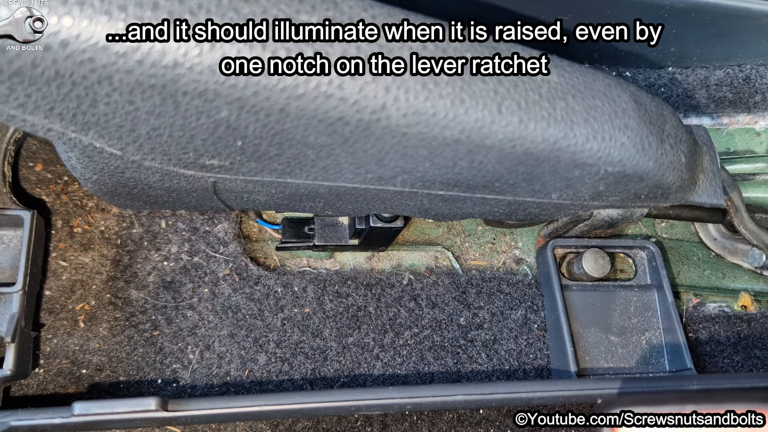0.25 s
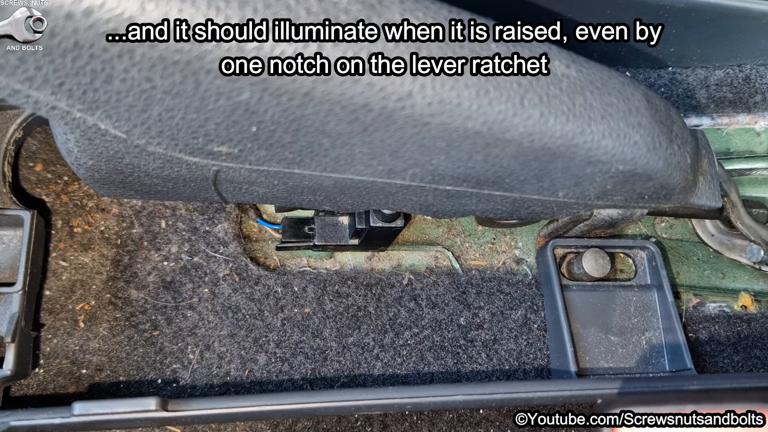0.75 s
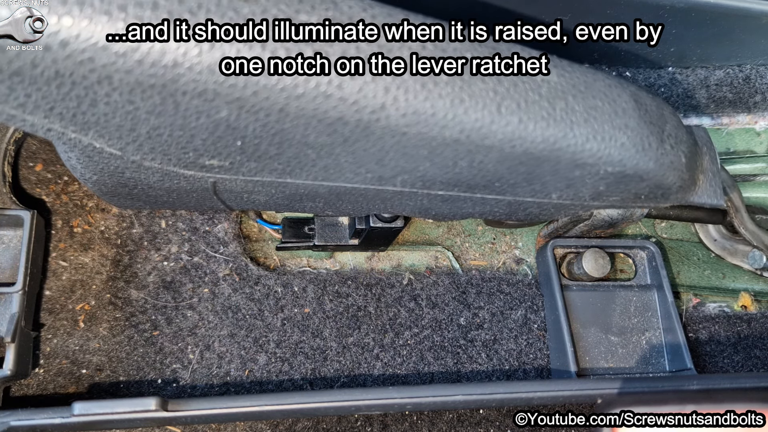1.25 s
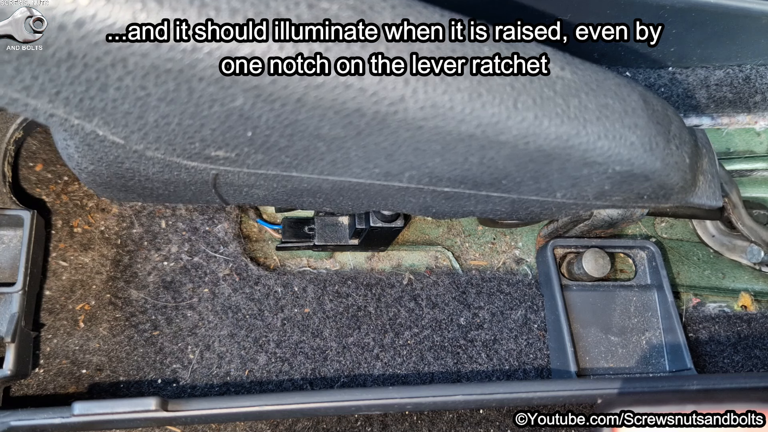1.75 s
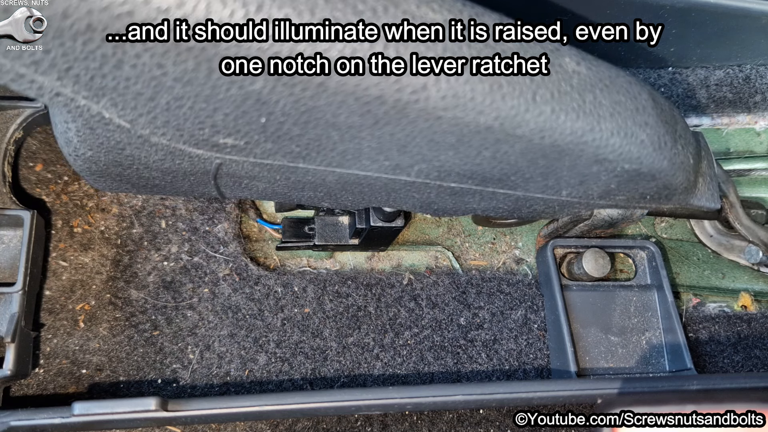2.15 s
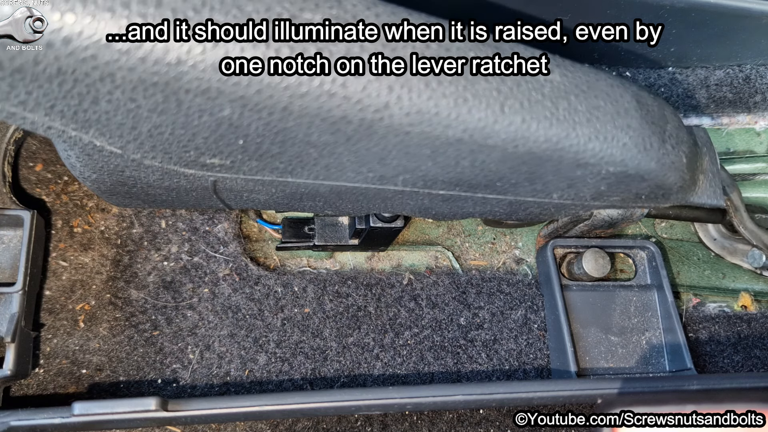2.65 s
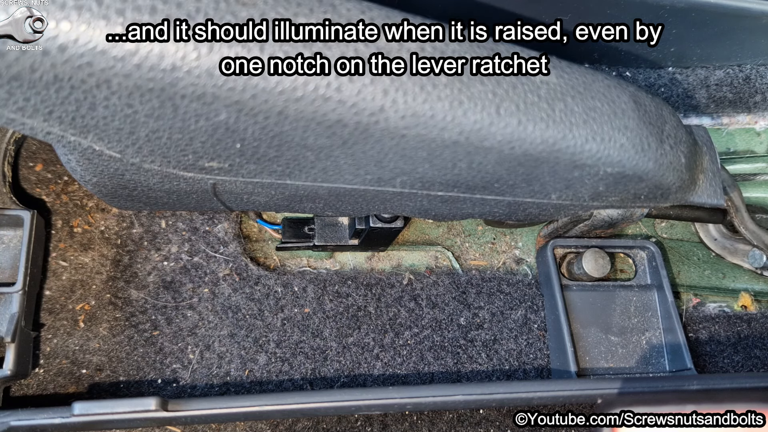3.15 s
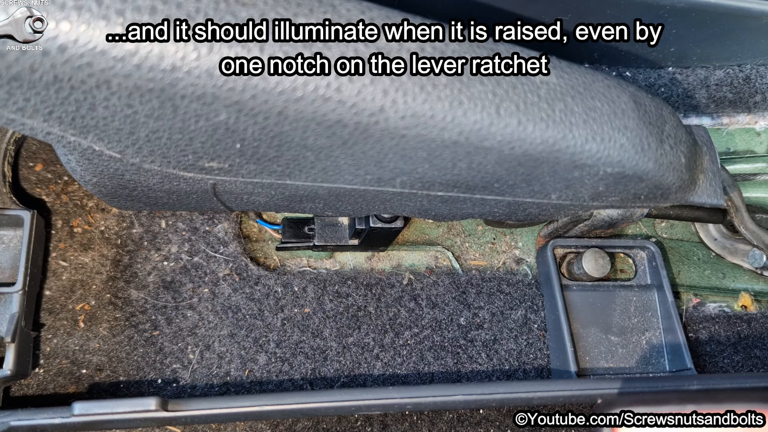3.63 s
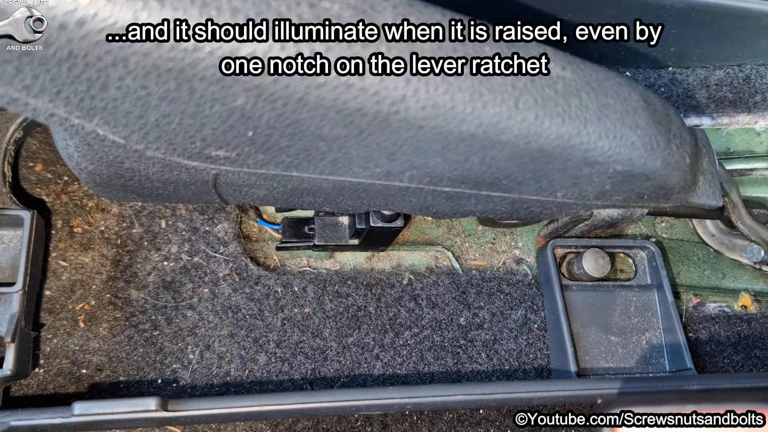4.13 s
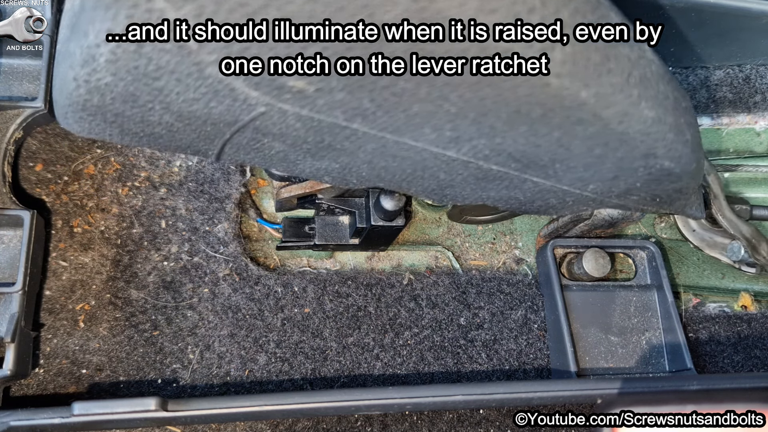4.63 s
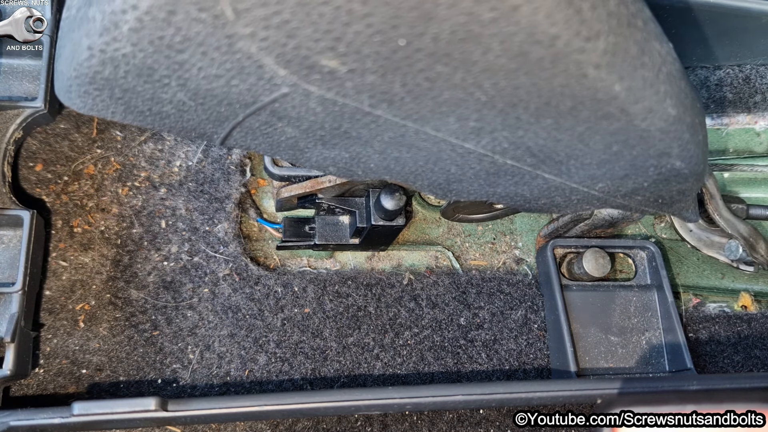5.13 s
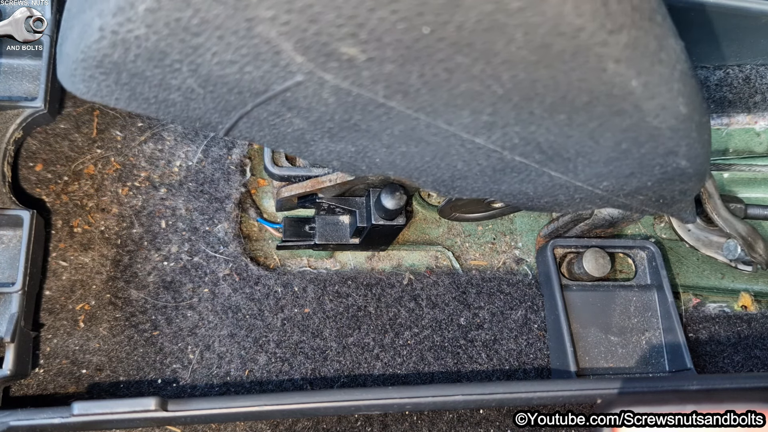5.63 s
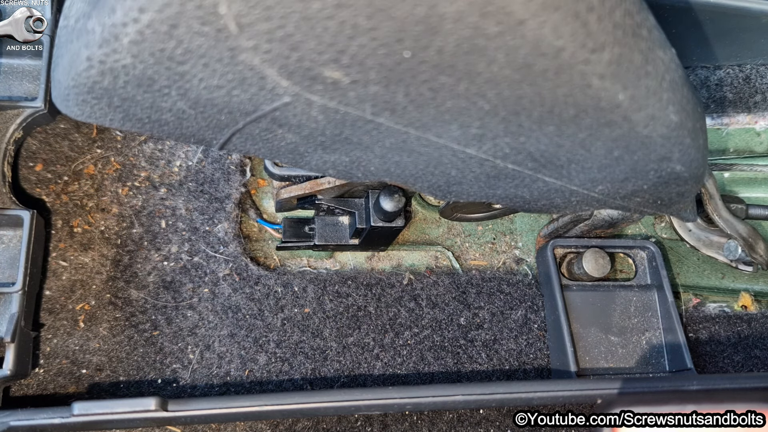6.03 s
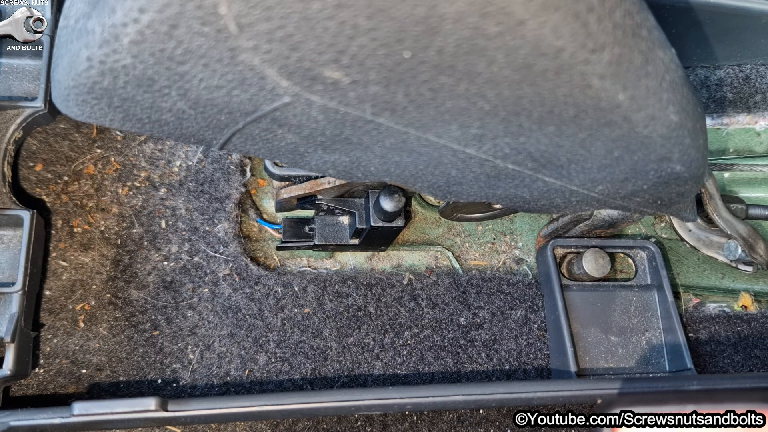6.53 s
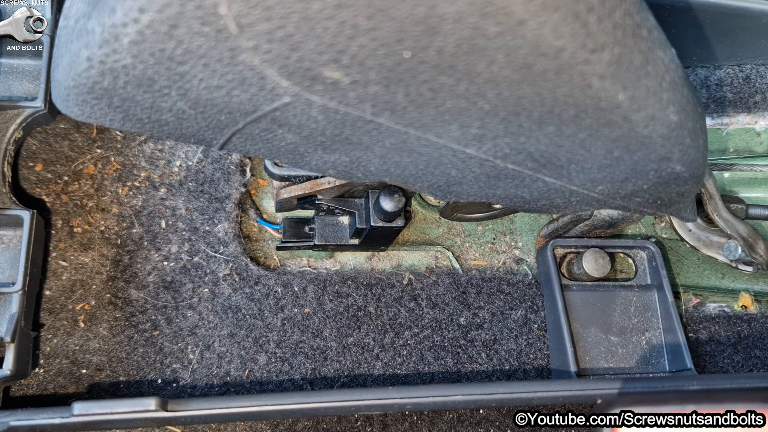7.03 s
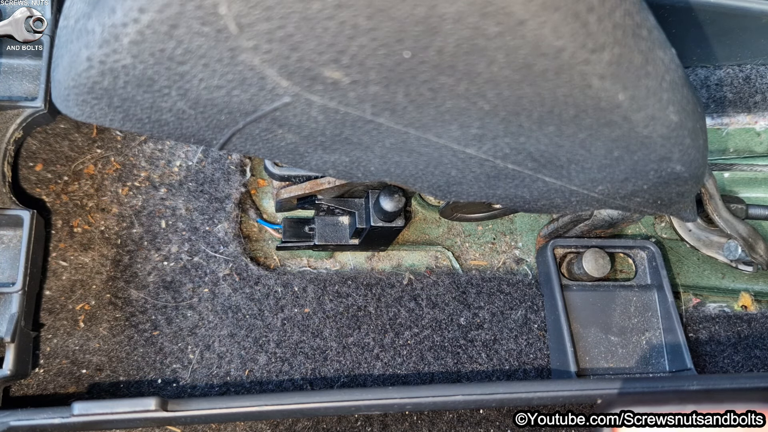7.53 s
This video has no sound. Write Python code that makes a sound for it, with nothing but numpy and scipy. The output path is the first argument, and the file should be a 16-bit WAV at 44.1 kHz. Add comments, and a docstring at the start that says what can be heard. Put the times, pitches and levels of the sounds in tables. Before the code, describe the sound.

Close, dry metal clicks and low floor knocks from a parked car's brake lever, sparse at first, loudest around five seconds, then faint hand rustles.

```python
"""In a parked car, a handbrake lever is worked up and down close to a two-port microphone.
The pawl snaps over ratchet teeth: chattering noise excites the modes of the steel. Jolts ring the floor pan
and the shell as decaying sines; the dragging lever sends random slips through the same pan modes.
The lever's slide and the hand on its cover are gated hiss. Diffuse reflections answer the clicks and thuds;
outside rumble, air hiss, a thin noise-band whine and one faint sine hum lie beneath."""
import sys
import numpy as np
from scipy import signal
from scipy.fft import rfft, irfft
from scipy.io import wavfile
from scipy.ndimage import uniform_filter1d

SR = 44100
rng = np.random.default_rng(int(sys.argv[2]) if len(sys.argv) > 2 else 0)


def persist_wave(psi):
    """Save psi, clipped to +-1, as 16-bit WAV."""
    counts = np.round(np.clip(psi, -1, 1) * 32767).astype(np.int16)
    wavfile.write(sys.argv[1], SR, np.atleast_2d(counts).T)


def volts_from_decibels(level):
    """Turn decibel levels (scalar or array-like) into linear amplitude factors."""
    exponent = np.asarray(level, float) / 20
    return 10 ** exponent


N = 342657

# Modes of the floor pan and lever mount. Each row: frequency in Hz, level in dB before focusing,
# decay time to -60 dB in seconds before the length factor.
PAN_MODES = [(100, -0.5, 0.26), (137.16, -3.5, .16), (185.5, -15.5, 0.17), (227.9, 2.5, 0.081),
             (298.7, 3.5, 0.044), (338.2, 0.5, 0.048), (485, 0.5, 0.029), (513.8, -8.5, .05),
             (600, -12.5, 0.017), (750, -4, 0.029), (800, -9.5, 0.019), (910, -17, 0.083)]
SLIDE_RISE_DB_S, SLIDE_FALL_DB_S = 904.5, 599


def evened(x):
    """Normalisation: scales to rms 1."""
    return x / np.sqrt(np.mean(x ** 2) + 1e-20)


def read(points, hz):
    """Interpolation of a spectrum table on a log-frequency axis."""
    f, value = np.transpose(points)
    return np.interp(np.log(hz + 1), np.log(f + 1), value)


def add(mix, s, sound):
    """Superposition: lays a sound into the mix at s seconds."""
    part = mix[..., round(s * SR):][..., :sound.shape[-1]]
    part += sound[..., :part.shape[-1]]


def ring(modes, t, gains_db, chance, cycles, length=1):
    """Modal synthesis: decaying sines, varied by chance, that swell over some cycles; peak 1."""
    hz, db, t60 = np.transpose(modes)[:, :, None]
    spread_db = 2 * chance[:len(modes)]
    decay_db = 60 * t / (t60 * length)
    swell = (1 - np.exp(-t * hz / cycles)) ** 2
    strength = volts_from_decibels(db + (gains_db + spread_db)[:, None] - decay_db) * swell
    detuned_hz = hz * (1 + 0.017 * chance[-len(modes):, None])
    x = (strength * np.sin(2 * np.pi * detuned_hz * t)).sum(0)
    return x / abs(x).max()


def strokes(rows, rise_db_s, fall_db_s):
    """Exponential envelopes: each stroke swells up to its start, holds, and dies away."""
    t = np.arange(N) / SR
    gain = 0
    for s, hold, db in rows:
        rise_db = rise_db_s * np.maximum(s - t, 0)
        fall_db = fall_db_s * np.maximum(t - s - hold, 0)
        gain = gain + volts_from_decibels(db - rise_db - fall_db)
    return gain


def noise(colour, size, same, patchy_db):
    """Filtered stereo noise, rms 1: random spectra with a set colour, coherence and drifting patches."""
    frames, hz = N * 4 // size + 5, np.fft.rfftfreq(size, 1 / SR)
    a, b, c, d, patches = rng.standard_normal((frames, len(hz), 5)).T
    patches = uniform_filter1d(patches, size=6, axis=0)
    patches = evened(uniform_filter1d(patches, size=10, axis=1))
    like = np.clip(read(same, hz), -1, 1)[:, None]
    left = a + 1j * b
    right = like * left + np.sqrt(1 - like ** 2) * (c + 1j * d)
    z = np.array([left, right]) * volts_from_decibels(read(colour, hz)[:, None] + patchy_db * patches)
    return evened(signal.istft(z, nperseg=size, noverlap=size * 3 // 4)[1][:, :N])


def favoured(colour, hz, favour_hz):
    """Resonance: the click's colour in dB, lifted around the pitch that the blow favours."""
    lift_db, half_width_octaves = 8, 0.12
    octaves = np.log2((hz + 1) / favour_hz)
    return read(colour, hz) + lift_db * np.exp(-(octaves / half_width_octaves) ** 2)


def ported(x, pan_db, luck):
    """Multipath interference: each port has its own direct path and near echoes above the bass."""
    # Standing left-right step. Each row: frequency in Hz, left minus right in dB.
    port_tilt = [(500, -11.5), (1200, -7.5), (3000, -4.5), (6000, -3), (12000, 8.5)]
    # Direct path, then console and seat echoes, one list a port.
    # Each row: delay in seconds (echoes before their random shift), level in dB.
    path_rows = [
        [(.001, 10), (.0017, -6), (.0023, -16), (.0032, -9.5), (.0045, -7.5)],
        [(.0014, -0.5), (.0019, -10), (.0027, -6), (.0038, 6), (.0051, -5.5)],
    ]
    echo_shift = 0.12  # random share by which echo delays vary from click to click
    shared_hz = 601  # well below this both ports share one echo pattern, at different levels
    hz = np.fft.rfftfreq(len(x), 1 / SR)
    direction_db = pan_db * np.clip(hz / 5000, 0, 1)  # direction shows most in the treble
    half = volts_from_decibels((direction_db + read(port_tilt, hz)) / 2)
    paths = np.zeros((2, len(hz)), complex)
    for port, taps in enumerate(path_rows):
        for k, (s, db) in enumerate(taps):
            delay = s * (1 + echo_shift * luck[k] * (k > 0))
            paths[port] += (-1) ** k * volts_from_decibels(db) * np.exp(-2j * np.pi * hz * delay)
    apart = hz ** 2 / (hz ** 2 + shared_hz ** 2)
    response = apart * paths + (1 - apart) * paths[0]
    return irfft(rfft(x) * response * [half, 1 / half], len(x))


def ratchet():
    """Impact excitation: a few ms of chattering contact give a broad crack that briefly rings the steel."""
    # Pawl and button clicks. Each row: time in seconds, peak between 4 and 9 kHz in dB, settings in dB
    # for the 1 kHz body and for 12 kHz, both relative to the colour near 6 kHz,
    # pitch the blow favours in Hz, left minus right in the treble in dB ahead of the standing step.
    clicks = [(0.0501, -61.5, 10.5, -40, 3370, -6), (0.0585, -62.5, 12, -20, 1700, 6),
              (0.3361, -51, -9.5, -20, 2540, -2), (1.3037, -25.5, 4.5, -15.5, 4320, 14),
              (1.7075, -46, -6.5, -15.5, 3540, -3.5), (2.7365, -33, 13.5, -49.5, 4340, 13),
              (4.102, -48.5, -8, -14.5, 3570, 0.5), (4.1534, -64, 27.5, -22, 2000, 3.5),
              (4.1982, -72, 23.5, -22, 690, 6), (4.2493, -60.5, 6, 0, 6500, 3.5),
              (4.2931, -58, 22, -21, 2500, 9), (4.7009, -21, -5, -29, 4920, -4),
              (4.7552, -47.5, 11.5, -62, 3370, 6), (4.785, -60.5, -0.5, -55, 5000, -4),
              (4.8386, -54, -15, -49, 5100, -6), (4.8902, -55.5, -14, -53, 5000, -1),
              (5.006, -45.5, -0.5, -5, 5000, 1), (5.012, -22.5, -15, -17, 3600, -2),
              (5.026, -11, -13, -23.5, 5680, 2.5), (5.24, -55.5, -8.5, -26, 7600, 11),
              (5.4177, -41.5, -21.5, -24, 4900, -4), (5.4646, -14.5, -10.5, -19.5, 4900, -3.5),
              (5.4988, -4.5, -14, -6, 6330, -1), (5.7372, -31, 0.5, -36, 4090, 1),
              (5.7718, -60.5, -7, -40, 3804, 3), (6.0889, -64, -0.5, -17, 5600, 10),
              (6.132, -47.5, -2, -18, 7850, 6), (6.162, -50, -18.5, -14, 4100, 9),
              (6.2013, -48, -8.5, -10, 8280, 9), (6.2784, -45.5, -9, -1, 7300, 7.5),
              (6.2879, -46.5, 0.5, -1, 2250, 1), (6.331, -43, 3.5, 0, 2300, 5.5)]
    # Modes of the steel pawl and toothed sector. Each row: frequency in Hz, level in dB before colouring,
    # decay time to -60 dB in seconds before the length factor.
    pawl = [(1344, 13, 0.042), (1860, -16.5, 0.04), (2280, -16, 0.02), (3632, -13.5, 0.05),
            (3850, 5, 0.033), (4070, -7, 0.055), (5960, 5, 0.014), (5730, -12, 0.15), (6305, -24.5, 0.012),
            (7280, -35, .03), (7700, 1, 0.019), (9800, -20.5, 0.025), (10700, -10.5, 0.04),
            (14800, -16, 0.038)]
    out, t = np.zeros((2, N)), np.arange(8192) / SR
    hz, mode_hz = np.fft.rfftfreq(len(t), 1 / SR), np.array(pawl)[:, 0]
    band = (hz > 4000) & (hz < 9000)
    chance = rng.standard_normal((len(clicks), 2 * len(pawl)))
    grit = rng.standard_normal((len(clicks), 2, len(t)))
    for (s, db, low_db, top_db, favour_hz, pan_db), luck, (rattle, hiss) in zip(clicks, chance, grit):
        mid_db = -3.0 + 0.63 * low_db  # the 3 kHz region follows the 1 kHz body by this share
        colour = [(250, low_db - 15), (650, low_db + 16), (1400, low_db + 8), (2900, mid_db + 7.5),
                  (4200, mid_db * 0.72 + 4.5), (5800, -0.22), (8000, top_db * 0.15), (11000, top_db),
                  (15000, top_db - 0.5), (16800, top_db - 26.5)]
        # the chatter of a hard snap dies sooner than that of a soft one
        chatter_s = np.interp(db, [-60, -10], (0.0011, 0.00083))
        touch = np.exp(-t / chatter_s) * (1 - np.exp(-t / 0.00026))
        seat = 0.27 * np.exp(-t / 0.0085) * (1 - np.exp(-t / 0.0053))  # slower settling
        modes = ring(pawl, t, read(colour, mode_hz), luck, cycles=0.5, length=0.2)
        steel = signal.fftconvolve(rattle * touch, modes)[:len(t)]
        crack = irfft(rfft(hiss) * volts_from_decibels(favoured(colour, hz, favour_hz)), len(t)) * touch
        dull = volts_from_decibels(read(colour, hz)) / np.hypot(1, hz / 3070)  # the settling is duller too
        crack += irfft(rfft(rattle) * dull, len(t)) * seat
        snap = ported(0.58 * evened(steel) + evened(crack), pan_db, luck[::-1])
        peak = abs(irfft(rfft(snap.mean(0)) * band, len(t))).max()
        fade = np.cos(np.pi / 2 * t / t[-1])
        add(out, s - 0.0006, volts_from_decibels(db) * snap / peak * fade)
    return out


def floor_pan():
    """Modal response to a jolt: the pan rings, high modes first, and the shell more slowly."""
    # Jolts into the floor pan. Each row: time in seconds (knock and boom start slightly later),
    # knock peak in dB, boom peak in dB relative to the knock, pitch the blow favours in Hz.
    thuds = [(0.051, -50.5, -6, 318), (0.339, -36.5, -31, 223), (0.55, -52.5, 3.5, 183),
             (0.645, -51, 4.5, 189), (1.19, -42.5, -15, 200), (1.267, -41.5, -1, 292),
             (1.301, -16.5, -10.5, 338), (1.707, -36.5, -34, 207), (1.838, -33, -23, 230),
             (2.455, -39, -10.5, 185), (2.552, -44.5, -9.5, 189), (2.583, -41, -21, 222),
             (2.637, -41, 0, 283), (2.659, -41, -17, 207), (2.7351, -18.5, -9.5, 324),
             (4.153, -37, -45, 246), (4.197, -33.5, -37, 206), (4.287, -44, -15, 242),
             (4.656, -21, -6.5, 299), (4.673, -26.5, -21, 262), (4.689, -26.5, -16.5, 313),
             (4.7, -25.5, -23, 328), (4.753, -31, -4, 258), (4.777, -32, -23, 316),
             (4.797, -28, -41, 219.3), (4.823, -37, -34, 205.7), (4.862, -30.5, -14, 231),
             (5.022, -19.5, -25.5, 255), (5.056, -42, -18.5, 152.6), (5.217, -52.5, 1, 153),
             (5.431, -52.5, -1.5, 314.6), (5.462, -22, -36.5, 373), (5.484, -16, -38, 370),
             (5.496, -18, -40, 247), (5.528, -23, -10.5, 234), (5.74, -29, -8.5, 156.7),
             (6.135, -43, -8.5, 151), (6.205, -50.5, -10, 225.4), (6.327, -40.5, -2.5, 226)]
    # Modes of the whole shell. Each row: frequency in Hz, level in dB, decay time to -60 dB in seconds.
    boom = [(41.5, 0, 0.14), (53.4, -7.5, .3), (82.86, -8, 0.17)]
    out, t = np.zeros(N), np.arange(SR // 2) / SR
    chance = rng.standard_normal((len(thuds), 2 * len(PAN_MODES)))
    for (s, db, boom_db, hz), luck in zip(thuds, chance):
        favour_db = -11.5 * np.log2(np.array(PAN_MODES)[:, 0] / hz) ** 2  # dB per squared octave
        knock = ring(PAN_MODES, t, favour_db, luck, cycles=0.82, length=0.73)
        add(out, s + 0.0015, volts_from_decibels(db) * knock)
        add(out, s + 0.016, volts_from_decibels(db + boom_db) * ring(boom, t, 0, luck, cycles=0.64))
    return out


def drag():
    """Stick-slip friction: random small slips at the pivot, heard muffled through the pan modes."""
    # Lever pivot and cable dragging. Each row: start in seconds, hold in seconds, level in dB.
    drags = [(.346, .33, -79.5), (1.07, 0.073, -72), (1.83, 0.039, -60.5), (2.49, 0.28, -60),
             (4.05, 0.036, -74), (4.158, .62, -55), (5.09, .02, -63), (5.27, .17, -78), (6.142, 0.11, -66),
             (6.296, 0.016, -63.5)]
    slips_per_s, rise_db_s, fall_db_s = 400, 302, 131
    sizes = volts_from_decibels(3.5 * np.minimum(rng.exponential(1, N), 4))
    slips = (rng.random(N) < slips_per_s / SR) * sizes * rng.choice([-1, 1], N)
    muffle_db = -5.5 * np.log2(np.array(PAN_MODES)[:, 0] / 270) ** 2
    t = np.arange(SR // 4) / SR
    body = ring(PAN_MODES, t, muffle_db, np.zeros(len(PAN_MODES)), cycles=0.8, length=0.6)
    return evened(signal.oaconvolve(slips, body)[:N]) * strokes(drags, rise_db_s, fall_db_s)


def brush():
    """Friction noise: fine sliding hiss, flickering as the grain of the surface catches."""
    # Hiss spectrum. Each row: frequency in Hz, relative density in dB per Hz.
    brush_colour = [(500, -24), (1200, -0.5), (1700, 1.5), (2500, -6), (4200, 2), (5500, -3.5), (7500, 3),
                    (9500, -3.5), (15000, -5.5), (16500, -16)]
    # The lever sliding in its gaiter. Each row: start in seconds, hold in seconds,
    # level in dB before the softening.
    slides = [(4.1, .06, -67), (4.2, 0.11, -71), (4.3, 0.11, -75), (4.42, 0.64, -74.5), (4.72, 0.051, -81),
              (4.8, 0.23, -75), (5.22, 0.027, -82), (5.425, 0.11, -56.5)]
    # The hand stroking the cover. Each row: start in seconds, hold in seconds, level in dB.
    hand_strokes = [(6.08, .03, -83.5), (6.13, 0.04, -65.5), (6.205, 0.0068, -75), (6.245, 0.012, -65),
                    (6.28, 0.0085, -62.5), (6.315, 0.044, -75), (6.815, 0.018, -74), (6.845, 0.026, -65.5),
                    (6.9, .07, -78), (6.99, .05, -86)]
    catch = volts_from_decibels(2.2 * evened(uniform_filter1d(rng.standard_normal(N), size=300)))
    hiss = noise(brush_colour, size=256, same=[(500, 0.6), (8000, 0.27)], patchy_db=0.5) * catch
    # the lever's own slide is duller than skin on the cover, and the gaiter softens it from 2500 Hz up
    dull = signal.sosfilt(signal.butter(4, 8540, fs=SR, output="sos"), hiss)
    dull = signal.lfilter(*signal.butter(1, 2500, fs=SR), dull)
    slide = dull * strokes(slides, SLIDE_RISE_DB_S, SLIDE_FALL_DB_S)
    hand = hiss * strokes(hand_strokes, SLIDE_RISE_DB_S, SLIDE_FALL_DB_S)
    return slide + hand


def cabin(x):
    """Diffuse reverberation: dense soft reflections, each band dying at its own speed."""
    # Each row: frequency in Hz, decay time to -60 dB in seconds.
    decay_times = [(250, 0.26), (1000, 0.12), (2200, .15), (4000, .085), (9000, 0.069), (15000, 0.02)]
    taps = np.zeros((2, SR // 3))
    slots = np.arange(60, SR // 3 - 20, 20)
    at = slots + rng.integers(0, 20, (2, len(slots)))  # one reflection at random in every 20 samples
    np.put_along_axis(taps, at, rng.choice([-1., 1.], at.shape), axis=1)
    hz, t, z = signal.stft(taps, SR, nperseg=256)
    decay = volts_from_decibels(-60 * t / read(decay_times, hz)[:, None])
    tail = signal.istft(z * decay, SR, nperseg=256)[1]
    return signal.oaconvolve(x, tail / np.linalg.norm(tail[0]), axes=1)[:, :N]


def outside_rumble():
    """Low-passed transmission: outside rumble through the body, as nearly coherent low noise."""
    # Each row: time in seconds, rms level in dB.
    levels = [(0.0, -63), (0.58, -49), (0.761, -59.5), (1.47, -49), (1.71, -53), (2.511, -53), (2.9, -49),
              (3.46, -56.5), (4.07, -52), (4.61, -47), (4.78, -53), (5.151, -50), (5.36, -54),
              (5.71, -46.5), (5.95, -53), (6.51, -55.5), (7.16, -55), (7.5, -55)]
    # Each row: frequency in Hz, relative density in dB per Hz.
    rumble_colour = [(8.8, -35.5), (15, 3), (32, -3), (64, 2), (78, -11), (88, -21), (92, -22),
                     (125, -15.5), (160, -28.5), (210, -65.5), (350, -120)]
    level = volts_from_decibels(np.interp(np.arange(N) / SR, *np.transpose(levels)))
    return level * noise(rumble_colour, size=4096, same=[(20, 1.0), (150, 0.96)], patchy_db=3.0)


def air():
    """Stationary noise: the still cabin and microphone hiss."""
    # Each row: frequency in Hz, relative density in dB per Hz.
    air_colour = [(71, -43), (120, -5.5), (170, -9.5), (201, -4.5), (232, -4.5), (252, -12), (396, -16),
                  (497, -21.5), (650, -14.5), (1130, -25), (1680, -21), (1820, -23.5), (3980, -33.5),
                  (5650, -34.5), (16500, -53.5)]
    # Each row: frequency in Hz, left-right likeness from -1 to 1.
    likeness = [(60, 1), (150, 1), (380, -0.064), (950, 0.145), (2380, -0.03), (5980, -0.5), (15000, 0.59)]
    return volts_from_decibels(-73) * noise(air_colour, size=1024, same=likeness, patchy_db=0.8)


def tones():
    """Narrow-band sound: a thin steady whine of filtered noise and a sine hum that swells and fades."""
    # Each row: whine frequency in Hz, width in Hz, rms level in dB.
    whines = [(1678, 27, -92)]
    hz, t = np.fft.rfftfreq(N, 1 / SR), np.arange(N) / SR
    whine = 0
    for f, width, db in whines:
        band = np.exp(-((hz - f) / width) ** 2)
        whine = whine + volts_from_decibels(db) * evened(irfft(rfft(rng.standard_normal((2, N))) * band, N))
    hum_hz, edge_db_s = 137, 125
    swell = strokes([(6.75, 0.23, -72)], edge_db_s, edge_db_s)  # start s, hold s, dB rms
    return whine + np.sqrt(2) * np.sin(2 * np.pi * hum_hz * t) * swell


def scene():
    """Superposition of lever, hand, cabin reflections and the quiet background."""
    clicks = ratchet()
    thuds = (floor_pan() + drag()) * volts_from_decibels(np.array([[0.3], [-0.3]]))  # slightly louder at the left
    reflections = volts_from_decibels(-20.5) * cabin(clicks) + volts_from_decibels(-21) * cabin(thuds)
    return clicks + thuds + brush() + reflections + outside_rumble() + air() + tones()


def roll_off(x):
    """The treble ends steeply here."""
    return signal.sosfilt(signal.butter(12, 16640, fs=SR, output="sos"), x)


def record(dry):
    """Soft limiting and band limiting: the loudest peaks stay under a ceiling, then a low-pass follows."""
    ceiling, edge_hz = 0.86, 16300
    rounded = dry / (1 + abs(dry / ceiling) ** 4) ** 0.25
    limited = signal.oaconvolve(rounded, signal.firwin(255, edge_hz, fs=SR)[None], "same")
    return roll_off(limited)


dry = scene()
out = record(dry)
persist_wave(out)
```